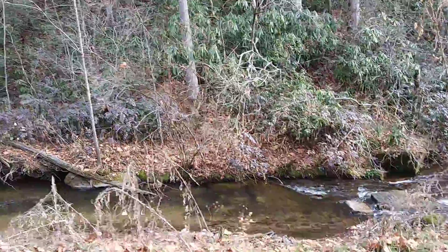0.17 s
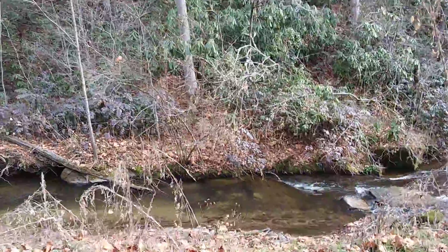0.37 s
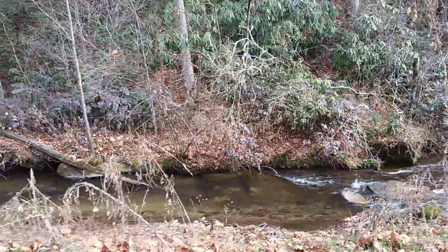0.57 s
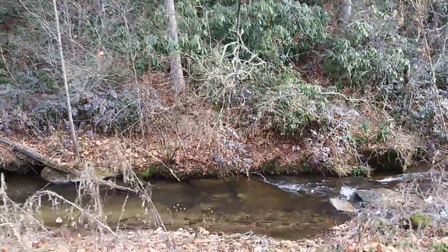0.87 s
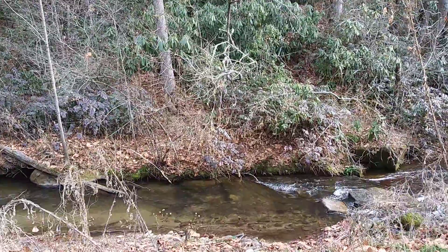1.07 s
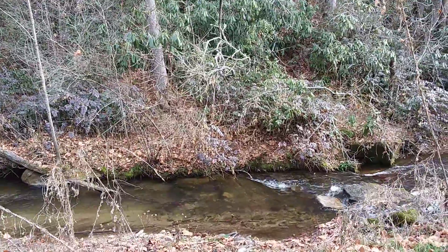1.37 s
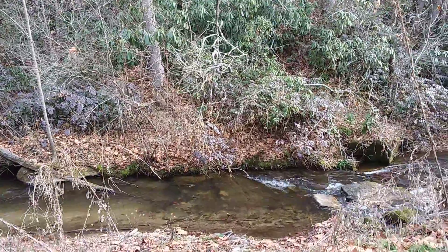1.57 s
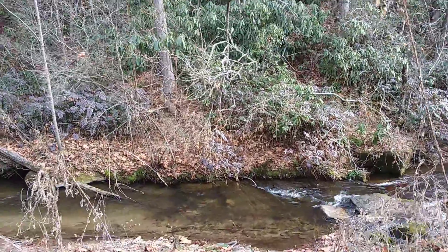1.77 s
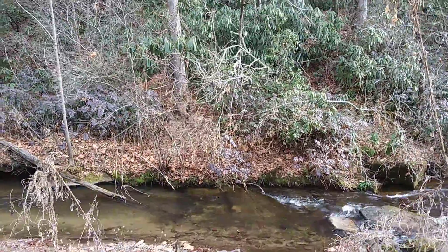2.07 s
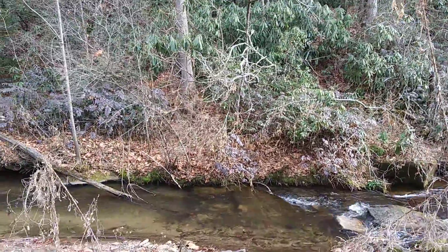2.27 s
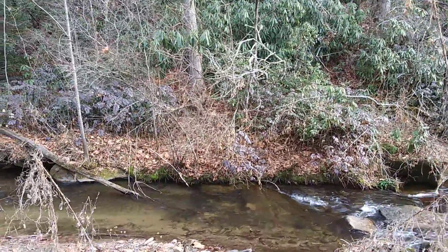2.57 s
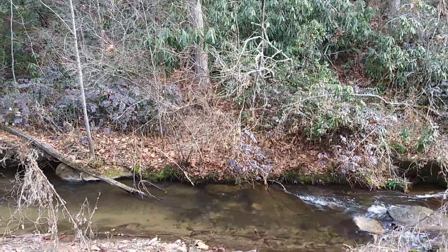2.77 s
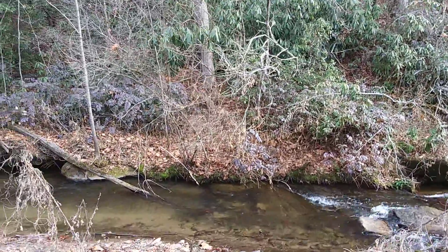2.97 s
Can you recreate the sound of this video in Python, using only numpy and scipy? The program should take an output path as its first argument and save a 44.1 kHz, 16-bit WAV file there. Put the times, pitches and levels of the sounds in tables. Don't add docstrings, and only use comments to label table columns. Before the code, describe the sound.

A shallow creek washes evenly over stones throughout, with tiny ringing bubbles, a low hollow gurgle and a barely audible throbbing far engine. Close by, dry leaves crackle in short stirrings from 0 s, brisk around 0.3-0.8 s, duller and softer from 0.8 to 2 s, with scattered stalk snaps and soft foot scuffs. Rustling peaks near 2.3 s, the loudest snap cracks at 2.5 s, then it eases. Open woodland, crisp small microphone.

```python
import sys
import numpy as np
from scipy import signal
from scipy.io import wavfile

SR = 44100
rng = np.random.default_rng(int(sys.argv[2]) if len(sys.argv) > 2 else 0)


def field_ratio(decibels):
    return 10 ** (np.asarray(decibels, dtype=float) / 20)


def unload_wav(signal):
    wavfile.write(
        sys.argv[1],
        SR,
        np.round(np.clip(np.atleast_2d(signal).T, -1, 1) * 32767).astype(np.int16),
    )


N = 138033

# (frequency [Hz], level per Hz [dB])
CREEK_TONE = [(45, -42), (105, -27), (220, 4), (400, -6), (1400, 2.5), (3300, -9.5), (7000, -18.5),
              (15500, -18.5)]
CREEK_DB, CREEK_FLICKER_DB = -38, 2.16
BUBBLES_PER_S, BUBBLES_DB, BUBBLE_CYCLES = 320, -47, 6.5

# (frequency [Hz], width [Hz], level [dB])
HOLLOW_POCKET = (222, 30, -54)

# (frequency [Hz], level [dB], throb depth [0-1])
ENGINE_HUMS = [(78.5, -59, .7), (63, -65, .1)]
THROB_PER_S, THROB_PEAK_S = 4.85, .125

# (frequency [Hz], level per Hz [dB])
LEAF_TONE = [(150, -28.5), (400, -10), (800, -5.5), (1450, -3.5), (2600, -8), (4000, -11), (7000, -11),
             (15500, -13)]
# (start [s], length [s])
STIRRINGS = [(.0, .14), (.15, .085), (.235, .085), (.325, .065), (.39, .075), (.465, .155), (.62, .11),
             (.73, .065), (.8, .32), (1.12, .12), (1.24, .29), (1.53, .03), (1.56, .41), (1.98, .13),
             (2.11, .065), (2.175, .035), (2.21, .12), (2.33, .07), (2.4, .048), (2.45, .06), (2.51, .16),
             (2.67, .21), (2.88, .09), (2.97, .12), (3.09, .06)]
# (level [dB], extra dull scuff [dB])
STIRRING_FORCE = [(-39.5, 9.5), (-29.5, 2.5), (-39, 6), (-30, -0.5), (-28.5, -0.5), (-25.5, -0.5),
                  (-29.5, 0.5), (-29, 1.5), (-37.5, 7), (-35.5, 5), (-35.5, 5), (-36.5, 7.5), (-36, 7),
                  (-31, 6.5), (-28, 4.5), (-25, 3.5), (-18.5, -0.5), (-18, 0), (-22, 1), (-30, 2.5),
                  (-31.5, 5), (-35, 8.5), (-32.5, 6), (-34.5, 6.5), (-26.5, 2)]
STIR_ATTACK_S, STIR_RELEASE_S = .025, .016
GRAINS_PER_S, GRAIN_SPREAD_DB, CLUMP_DB, LEAVES_TRIM_DB = 5000, 2.5, 1, -7
SCUFF_BELOW_HZ = 1980

# (time [s], peak level [dB], dull part [dB], brittle top [dB])
STALK_SNAPS = [(0.1067,-19,1,7), (0.1742,-12,-7,-8), (0.2284,-18.5,6,-4), (0.3145,-13,-7,-6),
               (0.3272,-11.5,-18,-11), (0.397,-9.5,-5,-11), (0.4265,-11,-3,2), (0.47,-19,-8,-8),
               (0.5246,-8,-10,-12), (0.749,-9.5,0.5,-4), (0.7752,-7,-3,-3), (1.0226,-14,-14,-4),
               (1.069,-16,-6.5,-4), (1.1996,-19,-8,-15), (1.3264,-8,-21,-7), (1.3773,-13,-6,-10),
               (1.5349,-6.5,-8,-6), (1.6561,-13.5,-17,-14), (1.7487,-23.5,11,-10), (1.8168,-14.5,-5,1),
               (1.9076,-12.5,-5,-11), (2.1755,-8,3.5,-6), (2.2114,-13,-2,2), (2.5416,-2.5,-2.5,-5),
               (2.5534,-7,-6,-11), (2.5726,-19,-8,5), (2.6114,-21,11.5,-2), (2.6923,-16,-13,-5),
               (2.9537,-7,-5.5,-5), (3.025,-14,-8,-8)]
SNAP_DECAY_S, SNAP_TRIM_DB = .001, -16.5
DULL_TOP_HZ, BRITTLE_FROM_HZ = 6500, 10500

# (time [s], level [dB], frequency [Hz], length [s])
SOFT_SCUFFS = [
    (.765, -30.5, 1500, .025),
    (1.165, -39, 250, .045),
    (2.132, -30, 1100, .013),
    (2.544, -25, 1100, .002),
]

# (frequency [Hz], width [Hz], boost [dB])
PORT_PEAKS = [
    (8905, 1130, 9.5),
    (11480, 870, 3),
    (5030, 480, 1.5),
    (1510, 850, 1),
    (15000, 3500, -1),
]
LOW_CUT_HZ, HIGH_CUT_HZ = 54.5, 15950


def rms_one(x):
    return x / np.sqrt(np.mean(x ** 2) + 1e-20)


def drift(rate):
    r = np.exp(-40 * np.pi * rate / SR)
    slow = signal.lfilter([1], [1, -2 * r, r * r], rng.standard_normal(N // 20 + 4002))[4000:]
    return np.interp(np.arange(N) / 20, np.arange(len(slow)), rms_one(slow - slow.mean()))


def band(x, low_hz, high_hz):
    edges = [low_hz, min(high_hz, .45 * SR)]
    return signal.sosfilt(signal.butter(2, edges, "band", fs=SR, output="sos"), x)


def coloured(pair, tone, flicker_db, low_db=0):
    out = 0
    edges = 35 * 2 ** np.arange(0, 9.2, 1 / 3)
    tone_hz, tone_db = np.transpose(tone)
    for k, (low, high) in enumerate(zip(edges, edges[1:])):
        hz = np.sqrt(low * high)
        level_db = np.interp(np.log(hz), np.log(tone_hz), tone_db)
        dull_db = low_db / (1 + (hz / SCUFF_BELOW_HZ) ** 4)
        gain = field_ratio(level_db + flicker_db * drift(9.2) + dull_db)
        out = out + gain * band(pair[k % 2], low, high)
    return out


def clicks(per_s, spread_db):
    size_db = spread_db * np.minimum(rng.exponential(1, N), 5)
    sizes = field_ratio(size_db) * rng.choice([-1, 1], N)
    return sizes * (rng.random(N) < per_s / SR)


def creek():
    wash = rms_one(coloured(rng.standard_normal((2, N)), CREEK_TONE, CREEK_FLICKER_DB))
    born = clicks(BUBBLES_PER_S * field_ratio(3 * drift(5)), 3.3) + 1e-18
    pitch_number = rng.integers(0, 24, N)
    rings = 0
    for k, hz in enumerate(np.geomspace(380, 2600, 24)):
        r = field_ratio(-60 * hz / BUBBLE_CYCLES / SR)
        w = 2 * np.pi * hz / SR
        struck = born * (pitch_number == k)
        rings = rings + signal.lfilter([0, np.sin(w)], [1, -2 * r * np.cos(w), r * r], struck)
    return field_ratio(CREEK_DB) * wash + field_ratio(BUBBLES_DB) * rms_one(rings)


def hollow():
    hz, width_hz, db = HOLLOW_POCKET
    fits = field_ratio(db + drift(5.7))
    gurgle = band(rng.standard_normal(N), hz - width_hz / 2, hz + width_hz / 2)
    return fits * rms_one(gurgle)


def engine():
    t = np.arange(N) / SR
    throb = np.cos(2 * np.pi * THROB_PER_S * (t - THROB_PEAK_S))
    out = 0
    for hz, db, depth in ENGINE_HUMS:
        level = field_ratio(db + 0.74 * drift(1.8)) * (1 + depth * throb)
        out = out + level * np.sin(2 * np.pi * hz * t + 0.26 * drift(4.1))
    return out


def leaves():
    t = np.arange(N) / SR
    power, scuff_db = 1e-9, 0
    for (start, length), (db, dull_db) in zip(STIRRINGS, STIRRING_FORCE):
        rise = np.clip((t - start) / STIR_ATTACK_S + .5, 0, 1)
        fall = np.exp(-np.maximum(t - start - length, 0) / STIR_RELEASE_S)
        shape = field_ratio(2 * db) * rise * fall
        power = power + shape
        scuff_db = scuff_db + shape * dull_db
    clumps = field_ratio(CLUMP_DB * (drift(103) + 0.76 * drift(170)))
    pair = rms_one(clicks(GRAINS_PER_S, GRAIN_SPREAD_DB)) + .8 * rng.standard_normal((2, N))
    crackle = coloured(pair * clumps, LEAF_TONE, 1.0, scuff_db / power)
    crackle = crackle / np.std(band(crackle, 3000, 15000))
    return field_ratio(LEAVES_TRIM_DB) * np.sqrt(power) * crackle


def snaps():
    out = np.zeros(N + SR)
    t = np.arange(600) / SR
    for s, db, dull_db, top_db in STALK_SNAPS:
        burst = rng.standard_normal(600) * np.exp(-t / SNAP_DECAY_S) * np.minimum(t / .0003, 1)
        parts = ((8200, 9800, 0), (700, DULL_TOP_HZ, dull_db + 8), (BRITTLE_FROM_HZ, 15000, top_db + 6))
        start = int(s * SR)
        for low, high, more_db in parts:
            part = band(burst, low, high)
            part = part / np.abs(part).max()
            out[start:start + 600] += field_ratio(db + more_db + SNAP_TRIM_DB) * part
    return out[:N]


def soft_scuffs():
    t = np.arange(N) / SR
    out = 0
    for s, db, hz, length in SOFT_SCUFFS:
        swell = np.exp(-((t - s) / length) ** 2)
        out = out + field_ratio(db) * swell * rms_one(band(rng.standard_normal(N), hz / 1.6, hz * 1.6))
    return out


def scene():
    mix = creek() + leaves() + snaps() + soft_scuffs() + engine() + hollow()
    return mix[None, :]


def roll_off(x):
    return signal.sosfilt(signal.butter(12, 16620, fs=SR, output="sos"), x)


def record(dry):
    x = signal.sosfilt(signal.butter(3, LOW_CUT_HZ, "high", fs=SR, output="sos"), dry)
    x = signal.sosfilt(signal.cheby2(20, 60, HIGH_CUT_HZ + 150, fs=SR, output="sos"), x)
    for hz, width_hz, boost_db in PORT_PEAKS + PORT_PEAKS:
        r = np.exp(-np.pi * width_hz / SR)
        ring = [1, -2 * r * np.cos(2 * np.pi * hz / SR), r * r]
        peak = signal.lfilter((1 - r * r) / 2 * np.array([1, 0, -1]), ring, x)
        x = x + (field_ratio(boost_db) - 1) * peak
    return roll_off(x)


dry = scene()
out = record(dry)
unload_wav(out)
```